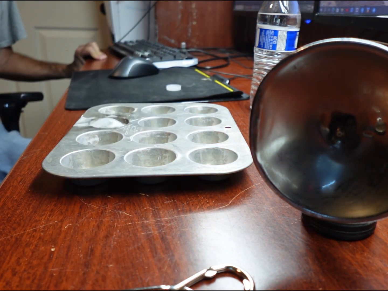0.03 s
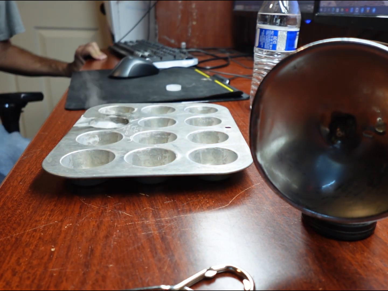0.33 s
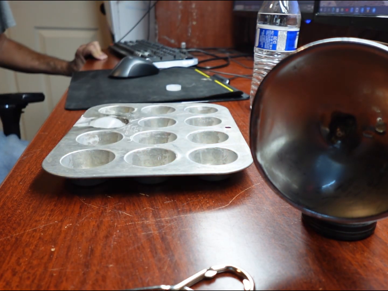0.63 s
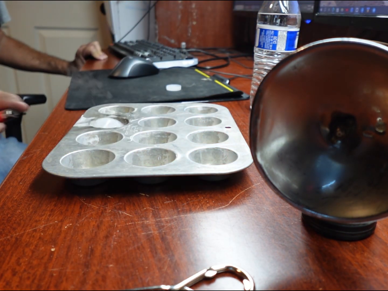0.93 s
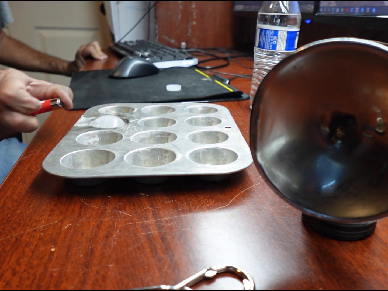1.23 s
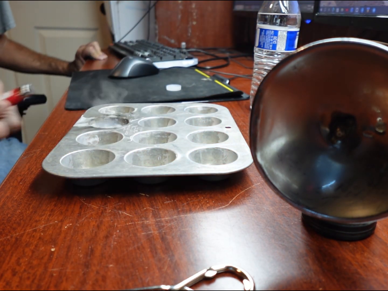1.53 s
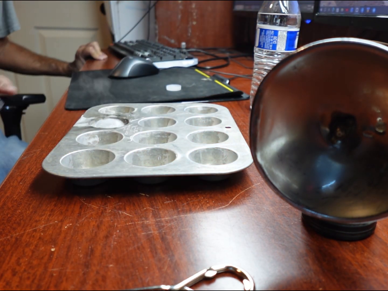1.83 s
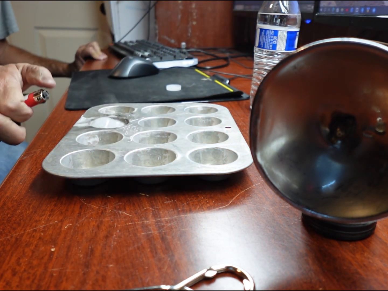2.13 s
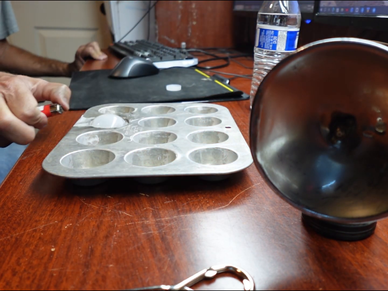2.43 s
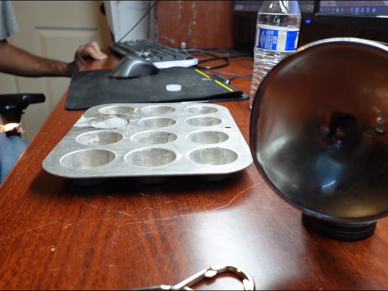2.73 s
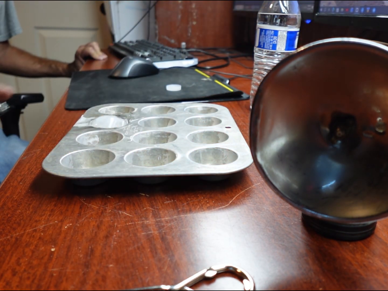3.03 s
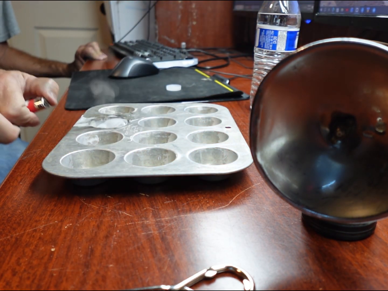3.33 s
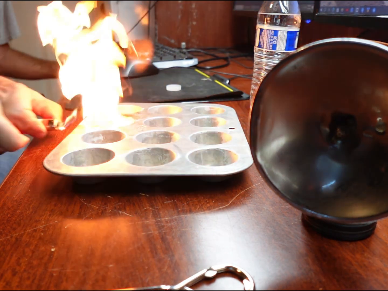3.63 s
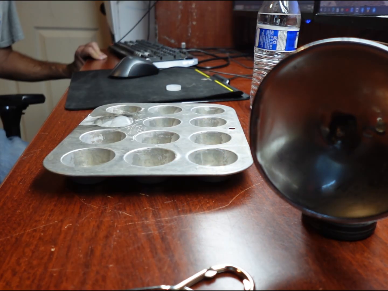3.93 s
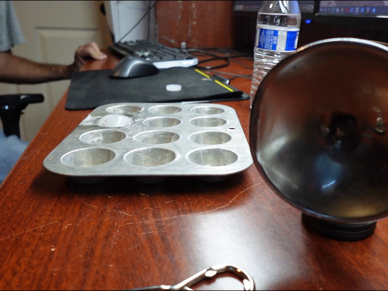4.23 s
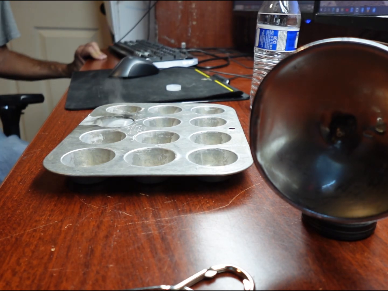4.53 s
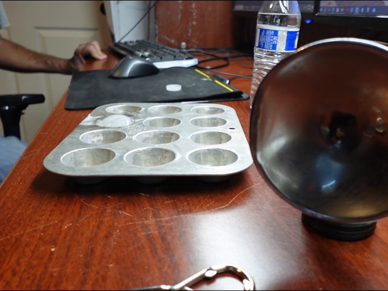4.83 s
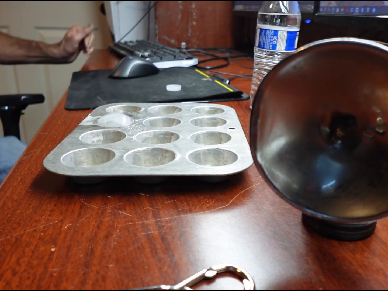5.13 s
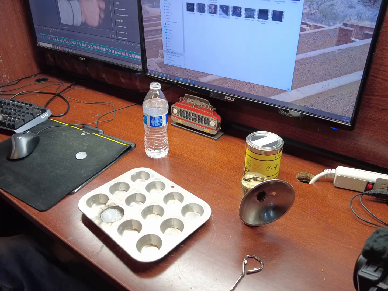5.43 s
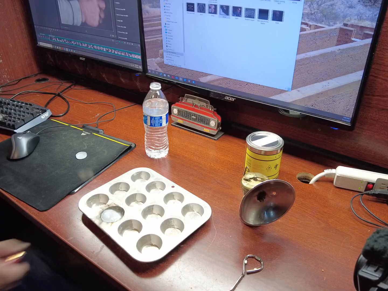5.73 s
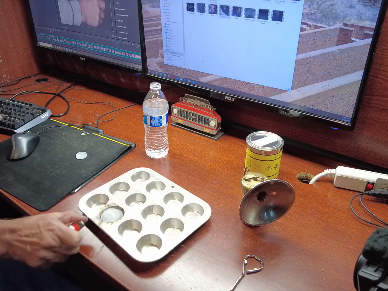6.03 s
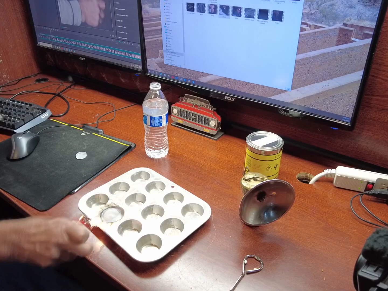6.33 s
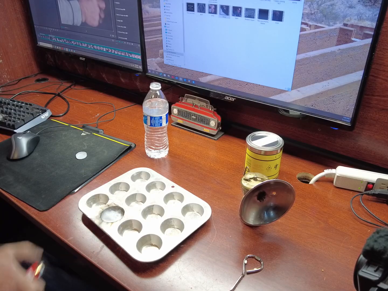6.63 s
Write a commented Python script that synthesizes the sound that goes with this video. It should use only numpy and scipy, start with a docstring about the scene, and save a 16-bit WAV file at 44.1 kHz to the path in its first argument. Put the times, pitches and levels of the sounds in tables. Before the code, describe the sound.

Something fizzes and spits in a metal tin while a lighter is struck several times, setting off gas with a sudden whoomp.

```python
"""A metal baking tin on a desk in a small ventilated room, close to a stereo microphone.
Something fizzes and spits in one cup of the tin, ringing the metal and giving off gas. A flint
lighter is struck: the first strike lights a small flame, the second fails, the third sets the gas
off with a whoomp. A few soft bumps come from the desk. After a short silent break the fizz is
weaker, the room hums, and the lighter catches once more."""
import sys
import numpy as np
from scipy import signal
from scipy.fft import rfft, irfft, next_fast_len
from scipy.io import wavfile

SR = 44100
rng = np.random.default_rng(int(sys.argv[2]) if len(sys.argv) > 2 else 0)


def waveform_to_disk(signal):
    """Save audio, clipped to [-1, 1], as 16-bit WAV at the path in sys.argv[1]."""
    frames = np.transpose(np.atleast_2d(signal))
    scaled = np.clip(frames, -1, 1) * 32767
    samples = np.round(scaled).astype(np.int16)
    wavfile.write(sys.argv[1], SR, samples)


N = 302967
TIME = np.arange(N) / SR

# Ventilation before and after the break. Each row: frequency in Hz, gain in dB.
VENT_SPECTRUM = [(20, -27), (55, -21.5), (100, -3.5), (165, 2), (300, -4), (500, -9.5), (800, -9.5),
                 (1500, -17.5), (16000, -43)]
LATE_VENT_SPECTRUM = [(20, -2.5), (45, 3.5), (75, -17.5), (110, -6.5), (170, -15.5), (280, -15.5),
                      (400, -21), (600, -21.5), (850, -26), (1500, -27.5), (16000, -44.5)]
# Hums in the room after the break. Each row: pitch in Hz, level in dB.
ROOM_HUMS = [(108, -65), (1166, -69.5), (1785, -64), (1860, -67), (2170, -82), (3190, -85)]
# The bubbling comes in three waves, one list each. Each row: time in seconds, relative level in dB.
BUBBLING_WAVES = [
    [(0.04, -40), (0.714, -39.5), (0.726, -44.5), (1.29, -41), (1.304, -48), (1.38, -41.5)],
    [(1.68, -46), (1.708, -44), (1.738, -42), (2.478, -39), (2.736, -42), (3.42, -43.5)],
    [(3.9, -44.5), (3.956, -45.5), (4.08, -39.5), (4.53, -43.5), (5.246, -44), (5.25, -44)],
]
# Resonances of the cup and whistles of escaping gas. Each row: pitch in Hz, width in Hz, gain in dB.
CUP_LOW_MODES = [(1018.5, 79, -8), (1087, 150, -18.5), (1438, 128, -4), (1553, 65, -7), (1733, 64, 0.5),
                 (1859, 152, -2.5)]
CUP_HIGH_MODES = [(2175, 110, 4), (2534, 98, 1.5), (2795, 68, 1.5), (3215, 190, -1), (3950, 120, -10.5)]
GAS_WHISTLES = [(3917, 82, -3.5), (4596, 63, -4), (4906, 41, 1), (5180, 100, -13), (8330, 80, -16)]
# Fine spray over the cup. Each row: frequency in Hz, gain in dB.
SPRAY_SPECTRUM = [(700, -30), (1100, -3), (3000, 2), (4300, 4), (5600, 4.5), (6600, -1.5), (7700, 2),
                  (10000, -3), (12500, -6.5), (16000, -7)]
# The largest drops spat from the cup. Each row: time in seconds, level in dB, pitch in Hz.
LARGE_DROPS = [(.276, -36, 6800), (.591, -43, 8500), (.729, -35.5, 6700), (1.259, -37.5, 6000),
               (1.305, -37.5, 5940), (1.597, -32.5, 7650), (1.765, -37.5, 7250), (2.120, -39.5, 8700),
               (2.362, -35.5, 6100), (2.398, -39, 6300), (2.941, -37.5, 8500), (3.267, -42.5, 13040),
               (5.255, -46, 9900), (5.816, -61, 9460), (5.955, -56, 5550)]
# The rasp of the flint and the sharp cracks. Each row: frequency in Hz, gain in dB.
FLINT_SPECTRUM = [(100, -30), (500, -15), (1000, -5), (2000, -2.5), (4000, 1), (7000, 0), (10000, -1.5),
                  (13500, 0.5), (16000, -5)]
CRACK_SPECTRUM = [(100, -26), (700, -26), (1800, -28), (2800, 5), (3700, -5), (5000, 3), (8000, 2.5),
                  (11000, -2), (16000, -7)]
# Strokes of the lighter's wheel. Each row: peak time in seconds, rasp level in dB, rasp fall in
# seconds, gas level in dB, gas fall in seconds.
WHEEL_STROKES = [(1.4552, -20.5, .009, -34.5, 0.077), (2.609, -22, 0.0078, -51, 0.024),
                 (3.5126, -19, 0.0054, -34, .018), (6.683, -33.5, 0.014, -39.5, 0.038)]
# Sharp cracks: snaps of the lever, and at 3.55 s the crack of the gas catching. Each row: time in seconds,
# level in dB, fall in seconds, ring pitch in Hz, ring level in dB.
SHARP_CRACKS = [(1.4764, -11.5, 0.0011, 4400, -25.5), (2.6119, -16.5, 0.0019, 3150, -20),
                (2.7749, -10.5, 0.0018, 5240, -26.5), (3.55, -16, 0.004, 4130, -23),
                (6.7016, -23.5, 0.0027, 4230, -33.5)]
# The lighter catches. Each row: time in seconds, puff level in dB, puff corner in Hz, push width
# in seconds, jet level in dB.
FLAME_CATCHES = [(1.501, -26, 355, 0.0013, -28), (6.713, -27.5, 372, 0.0023, -42.5)]
# Resonances of the lighter's hood. Each row: pitch in Hz, width in Hz, gain in dB.
HOOD_MODES = [(4350, 360, 0.5), (7240, 170, 2.5)]
# Bumps at the desk. Each row: time in seconds, level in dB, fall in seconds, corner in Hz.
DESK_BUMPS = [(2.979, -52, 0.016, 500), (4.172, -52.5, 0.043, 450), (4.72, -49.5, 0.016, 130),
              (4.938, -46, 0.007, 900), (5.307, -48.5, 0.025, 120)]
# Pockets of gas going off. Each row: time in seconds, roar level in dB, push level in dB.
GAS_POCKETS = [(3.556, -19.5, -41), (3.576, -21, -27), (3.584, -18.5, -15.5), (3.603, -21.5, -15.5),
               (3.611, -23, -10.5), (3.632, -25.5, -15.5), (3.658, -28.5, -16)]
# Low resonances of room and desk. Each row: pitch in Hz, 60 dB decay in seconds, relative gain in dB.
BOOM_MODES = [(111, 0.31, -1.5), (155.5, 0.28, 5.5), (186, 0.21, -4), (224.7, 0.29, -1.5),
              (321.4, 0.26, 3.5), (381, 0.23, 4.5), (488, 0.35, 4.5), (568, 0.23, 4.5), (733, 0.28, 2),
              (834, 0.28, -3), (1160, .4, 4), (1390, 0.31, 1)]
# Decay of the room's tail. Each row: frequency in Hz, 60 dB decay in seconds.
TAIL_DECAY = [(100, .53), (400, 0.48), (1500, 0.56), (3000, .39), (6000, 0.31), (12000, 0.36)]
# Colour of the room's tail. Each row: frequency in Hz, relative gain in dB.
TAIL_SPECTRUM = [(40, -13), (150, -16.5), (350, -12), (700, -7.5), (2000, -5.5), (5000, 0.5), (9000, -5),
                 (16000, -10.5)]
# Width of diffuse sound at the microphone. Each row: frequency in Hz, side minus mid in dB.
STEREO_WIDTH = [(50, -18), (300, -8.5), (700, -9.5), (1500, -15), (3500, -9.5), (7000, -8), (15000, -24)]
# Reflections off desk and wall. Each row: left delay in seconds, right delay in seconds, gain in dB.
REFLECTIONS = [(.0011, .00085, -22), (.0033, .0034, -10), (.0131, .0134, -15)]

BREAK_START_S, BREAK_END_S = 5.333, 5.776


def from_db(db):
    """Decibels to gain."""
    return 10 ** (np.asarray(db) / 20)


def rms_one(x):
    """Scale to unit power."""
    return x / np.sqrt(np.mean(x ** 2) + 1e-20)


def at_hz(points, hz):
    """Read a table on a log-frequency axis."""
    table_hz, values = np.array(points).T
    return np.interp(np.log(np.maximum(hz, 1)), np.log(table_hz), values)


def colour(x, spectrum):
    """Give a signal a smooth spectrum."""
    size = next_fast_len(x.shape[-1] + 2048)
    gain = from_db(at_hz(spectrum, np.fft.rfftfreq(size, 1 / SR)))
    return irfft(rfft(x, size) * gain, size)[..., :x.shape[-1]]


def cut(x, hz, kind, order):
    """Butterworth filter."""
    return signal.sosfilt(signal.butter(order, hz, kind, fs=SR, output="sos"), x)


def resonate(x, modes):
    """Parallel resonances (Hz, width in Hz, dB) of alternating sign."""
    out = 0
    for k, (hz, width, db) in enumerate(modes):
        radius = np.exp(-np.pi * width / SR)
        feed = (1 - radius ** 2) / 2 * np.array([1, 0, -1])
        feedback = [1, -2 * radius * np.cos(2 * np.pi * hz / SR), radius ** 2]
        out = out + (-1) ** k * from_db(db) * signal.lfilter(feed, feedback, x + 1e-18)
    return out


def grains(spread_db):
    """Dense tiny impulses of uneven strength."""
    noise = rng.standard_normal(N)
    strength = from_db(spread_db * np.clip(rng.standard_normal(N), -2, 2))
    return rms_one(noise * strength)


def widen(mid, side):
    """Two unrelated signals become the left and right of a diffuse sound."""
    return mid + colour(side, STEREO_WIDTH) * np.array([[1], [-1]])


def swell(s, rise_s, fall_s):
    """An exponential rise to 1 at time s and an exponential fall."""
    exponent = np.maximum((s - TIME) / rise_s, (TIME - s) / fall_s)
    return np.exp(-np.minimum(exponent, 30))


def gushes(depth_db, hz):
    """A randomly wavering gain, mostly slower than hz."""
    return from_db(depth_db * rms_one(cut(rng.standard_normal(N), hz, "low", order=2)))


def room_tone():
    """Soft ventilation all round the microphone, with more rumble and a few hums after the break."""
    early = rms_one(colour(widen(*rng.standard_normal((2, N))), VENT_SPECTRUM))
    late = rms_one(colour(widen(*rng.standard_normal((2, N))), LATE_VENT_SPECTRUM))
    hums = sum(from_db(db) * rms_one(resonate(rng.standard_normal(N), [(hz, 9, 0)]))
               for hz, db in ROOM_HUMS)
    return np.where(TIME < BREAK_END_S, from_db(-60) * early, from_db(-53) * late + hums)


def reaction():
    """Levels in dB of bubbling, froth, spray and whistles; the break leaves a weak fizz, no whistles."""
    crest_s, whistles_full_s = 2.37, 2.34
    bubbling = np.interp(TIME, *np.concatenate(BUBBLING_WAVES).T) - 0.8
    froth = -45 - 0.97 * (TIME - crest_s) ** 2
    whistles = -50.5 - 5 * np.maximum(whistles_full_s - TIME, 0)
    early = TIME < (BREAK_START_S + BREAK_END_S) / 2
    return (np.where(early, bubbling, -59), np.where(early, froth, -60),
            np.where(early, -49, -68), np.where(early, whistles, -np.inf))


def sheet_ring(x, t60, ring_db):
    """The thin metal adds a dense cloud of short-lived modes to whatever excites it."""
    t = TIME[:SR // 8]
    cloud = rng.standard_normal(len(t)) * from_db(-60 * t / t60)
    response = from_db(ring_db) * cloud / np.sqrt(np.sum(cloud ** 2))
    response[0] += 1
    return rms_one(signal.fftconvolve(x, response[None], axes=1)[:, :N])


def fizz(bubbling_db, froth_db, spray_db, whistle_db):
    """Countless bubbles burst in the cup and ring it; fine spray and thin gas whistles lie on top."""
    bursts = widen(grains(5.26), grains(5.0))
    droplets = widen(grains(9.1), grains(5.5))
    # the shifting foam favours now one set of resonances, now the other
    rings = sum(resonate(bursts, CUP_LOW_MODES[k::2]) * gushes(depth_db=2, hz=9.5) for k in range(2))
    bubbling = cut(rings, [930, 2300], "band", order=4)
    froth = cut(resonate(droplets, CUP_HIGH_MODES), [1700, 4600], "band", order=2)
    froth *= gushes(depth_db=2.17, hz=6)
    whistle = cut(resonate(droplets, GAS_WHISTLES), 3500, "high", order=2)
    whistle *= gushes(depth_db=2.95, hz=5)
    spray = colour(bursts, SPRAY_SPECTRUM) * gushes(depth_db=1.5, hz=25)
    return (from_db(bubbling_db) * sheet_ring(bubbling, t60=0.17, ring_db=-6)
            + from_db(froth_db) * sheet_ring(froth, t60=0.13, ring_db=1)
            + from_db(spray_db) * sheet_ring(spray, t60=0.068, ring_db=1)
            + from_db(whistle_db) * sheet_ring(whistle, t60=0.081, ring_db=5))


def small_drops(spray_db, count=40, per_second=3.4, low_hz=5690, high_hz=9030):
    """Drops thrown up at random with the spray, as rows of time in seconds, level in dB, pitch in Hz."""
    wait, smallness, pitch = rng.random((count, 3)).T
    s = np.cumsum(-np.log(1 - wait)) / per_second
    db = np.interp(s, TIME, spray_db) + 8 - 7 * smallness
    hz = low_hz * (high_hz / low_hz) ** pitch
    return np.c_[s, db, hz][s < TIME[-1]]


def spits(spray_db):
    """Each drop spat from the cup gives a short sizzle with a chirp at a pitch of its own."""
    sizzle, out = grains(2.0), 0
    for s, db, hz in [*LARGE_DROPS, *small_drops(spray_db)]:
        chirp = resonate(sizzle, [(hz, 0.18 * hz, 0)])
        splash = resonate(sizzle, [(hz, 0.43 * hz, -6.5)])
        out += from_db(db) * rms_one(chirp + splash) * swell(s, rise_s=.00072, fall_s=.005)
    return out


def flint_strikes(tooth_hz=700):
    """The thumb drags the toothed wheel, spins it over the flint and lands on the gas valve."""
    tooth_rate = tooth_hz * (1 + 3 * rng.standard_normal(N))
    teeth = 1 + 0.5 * np.sin(2 * np.pi * np.cumsum(tooth_rate) / SR)
    rasp = rms_one(colour(grains(10.0) * teeth, FLINT_SPECTRUM))
    hiss = rms_one(colour(grains(4.1), FLINT_SPECTRUM))
    out = 0
    for s, db, fall, gas_db, gas_fall in WHEEL_STROKES:
        drag = from_db(db - 15) * hiss * swell(s - .018, rise_s=.0024, fall_s=.02)
        spin = from_db(db) * rasp * swell(s, rise_s=.0044, fall_s=fall)
        gas = from_db(gas_db) * hiss * swell(s + .023, rise_s=.008, fall_s=gas_fall)
        out += drag + spin + gas
    return out


def sharp_cracks():
    """Sharp cracks of the lever, and the crack of the gas catching at the third strike, each bounce and ring
    the hood as a close, beating pair of modes."""
    crack, out = rms_one(colour(grains(0.94), CRACK_SPECTRUM)), 0
    for s, db, fall, hz, ring_db in SHARP_CRACKS:
        hit = swell(s, rise_s=.00014, fall_s=fall)
        bounce = from_db(-15.5) * swell(s + .0029, rise_s=.0002, fall_s=.0056)
        out += from_db(db) * crack * (hit + bounce)
        phase = 2 * np.pi * hz * (TIME - s)
        ring = np.sin(.985 * phase) + .7 * np.sin(1.025 * phase)
        out += from_db(ring_db) * ring * swell(s, rise_s=.0003, fall_s=.0081)
    return out


def push(s, width_s):
    """A pocket of gas expands and stops: one pressure swing, up then down."""
    u = np.clip((TIME - s) / width_s, -10, 10)
    return -u * np.exp((1 - u * u) / 2)


def lighter_flame(eddies):
    """The small flame catches with a low puff and a pressure push, then flutters once."""
    out = 0
    for s, db, hz, width_s, _ in FLAME_CATCHES:
        rumble = rms_one(cut(eddies, hz, "low", order=5))
        puff = from_db(-9.5) * rumble * swell(s, rise_s=.0091, fall_s=.022)
        flutter = from_db(-2) * push(s + .0102, width_s)
        out += from_db(db) * (puff + push(s, width_s) + flutter)
    return out


def gas_jet():
    """The jet sings briefly in the lighter's hood as it lights."""
    tone = rms_one(resonate(grains(0.94), HOOD_MODES))
    return tone * sum(from_db(db) * swell(s + .017, rise_s=.018, fall_s=.03)
                      for s, *_, db in FLAME_CATCHES)


def desk_bumps():
    """Soft contacts with the desk give dull thuds."""
    noise, out = cut(grains(1.0), 107, "high", order=2), 0
    for s, db, fall, hz in DESK_BUMPS:
        thud = rms_one(cut(noise, hz, "low", order=2))
        out += from_db(db) * thud * swell(s, rise_s=.0036, fall_s=fall)
    return out


def roar(eddies, hz):
    """Turbulent burning, strongest in the two octaves below hz."""
    band = cut(eddies, [hz / 4, hz], "band", order=1)
    return rms_one(cut(band, 3600, "low", order=2))


def whoomp(eddies, start_hz=3150, end_hz=551, sink_s=.016):
    """Pockets of gas go off in turn; as the fireball grows its roar sinks and its pushes lengthen."""
    first_s, last_s = GAS_POCKETS[0][0], GAS_POCKETS[-1][0]
    out = 0
    for s, roar_db, push_db in GAS_POCKETS:
        age = s - first_s
        hz = end_hz + (start_hz - end_hz) * np.exp(-age / sink_s)
        out += from_db(roar_db) * roar(eddies, hz) * swell(s, rise_s=.0017, fall_s=.0053)
        out += from_db(push_db) * push(s, width_s=.00027 + .01 * age)
    burn_out = from_db(-29) * roar(eddies, hz=560) * swell(last_s, rise_s=.0068, fall_s=.049)
    return out + burn_out


def room(x):
    """The microphone hears direct sound, near reflections, low boom and a tail dying band by band."""
    t = TIME[:SR // 2]
    spectrum = rfft(widen(*rng.standard_normal((2, len(t)))))
    bins_hz = np.fft.rfftfreq(len(t), 1 / SR)
    edges_hz = np.r_[0, np.geomspace(125, 16000, 8)]
    tail = 0
    for low, high in zip(edges_hz, edges_hz[1:]):
        band = irfft(spectrum * ((bins_hz >= low) & (bins_hz < high)), len(t))
        tail += band * from_db(-60 * t / at_hz(TAIL_DECAY, (low + high) / 2))
    # things on the desk scatter at once; the walls answer about 30 ms later
    tail *= 1 - np.exp(-t / .003) + .7 * np.clip((t - .02) / .015, 0, 1)
    response = from_db(-2.5) * colour(tail / np.sqrt(np.sum(tail ** 2) / 2), TAIL_SPECTRUM)
    response[:, 0] += from_db([-.3, .3])  # direct sound, a touch right of centre
    for left_s, right_s, db in REFLECTIONS:
        response[[0, 1], [int(left_s * SR), int(right_s * SR)]] += from_db(db)
    boom = resonate(x, [(hz, np.log(1000) / np.pi / t60, db) for hz, t60, db in BOOM_MODES])
    return signal.fftconvolve(x[None], response)[:, :N] + from_db(6) * boom


def scene():
    """The tin, the lighter and the desk from close by, with the room behind them."""
    bubbling_db, froth_db, spray_db, whistle_db = reaction()
    cup = fizz(bubbling_db, froth_db, spray_db, whistle_db) * from_db([[-.35], [.35]])
    lighter = flint_strikes() + gas_jet() + sharp_cracks()
    eddies = cut(grains(3.6), 99, "high", order=2)
    flames = cut(lighter_flame(eddies) + whoomp(eddies), 95, "high", order=3)
    return room(lighter + flames + spits(spray_db) + desk_bumps()) + cup + room_tone()


def record(dry, fade_s=.004, cutoff_hz=15900):
    """The stereo microphone: silent during the break, with rounded peaks and the top treble cut."""
    left, right = dry
    right = signal.lfilter([.7, 1], [1, .7], right)  # this port lags by a fraction of a sample
    outside_break_s = np.maximum(BREAK_START_S - TIME, TIME - BREAK_END_S)
    gate = np.clip(outside_break_s / fade_s + 1, 0, 1)
    rounded = 0.56 * np.tanh(np.array([left, right]) * gate / 0.53)
    return signal.sosfilt(signal.ellip(10, .2, 80, cutoff_hz, fs=SR, output="sos"), rounded)


dry = scene()
out = record(dry)
waveform_to_disk(out)
```